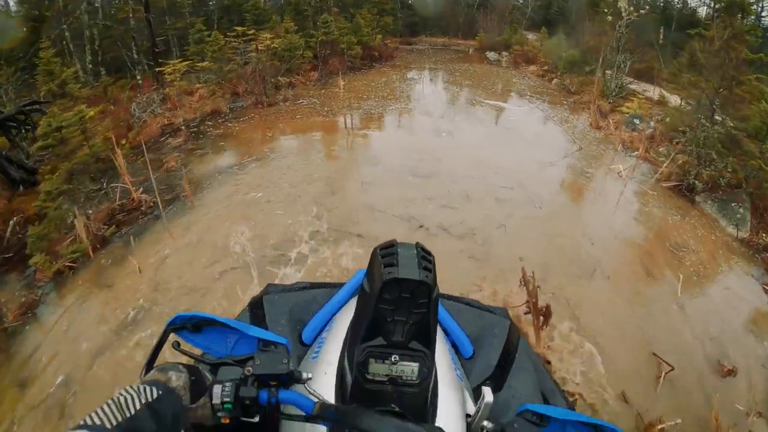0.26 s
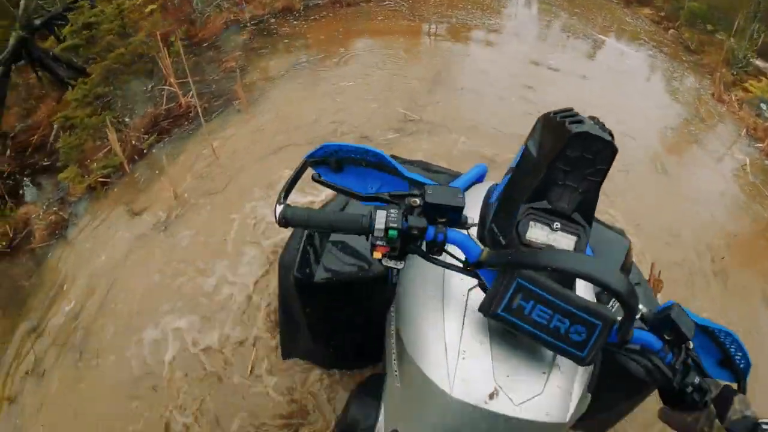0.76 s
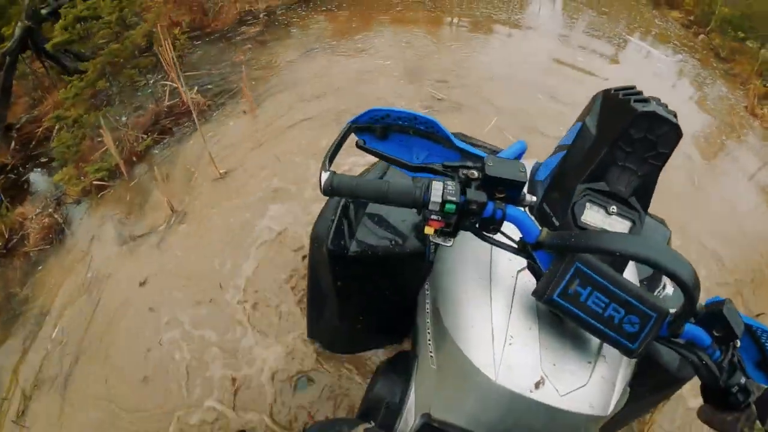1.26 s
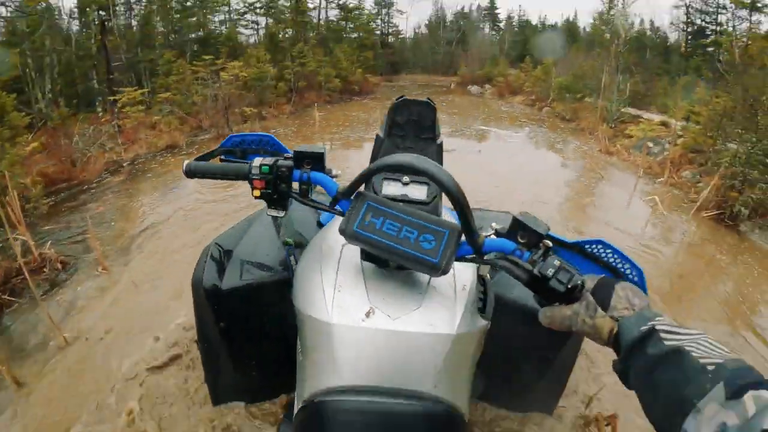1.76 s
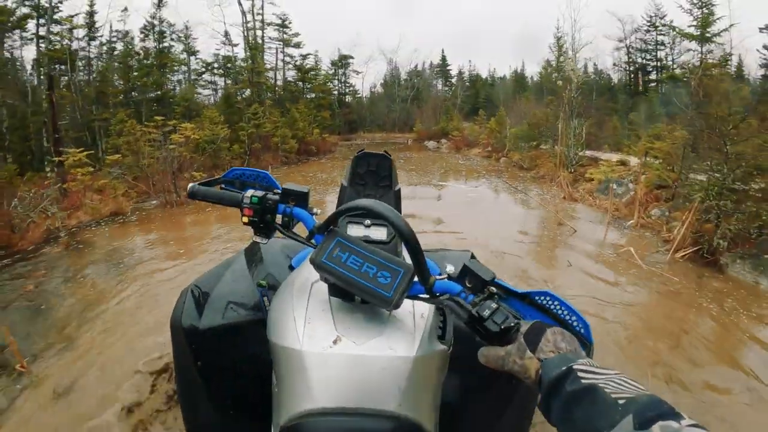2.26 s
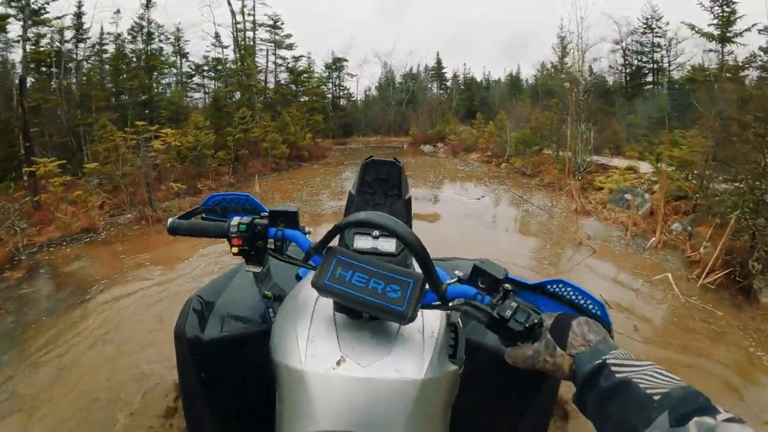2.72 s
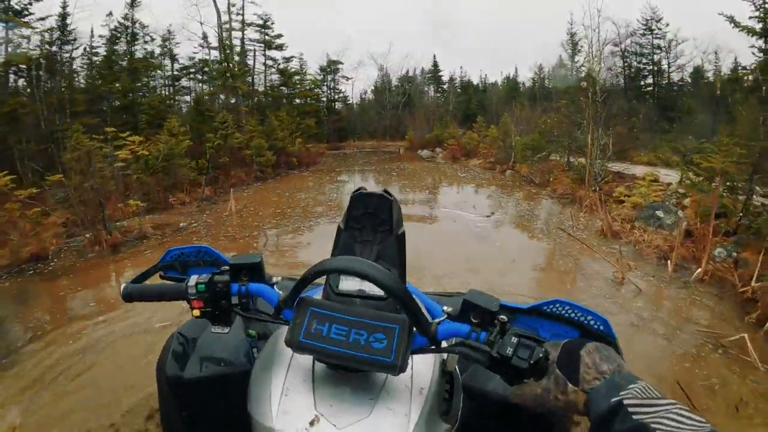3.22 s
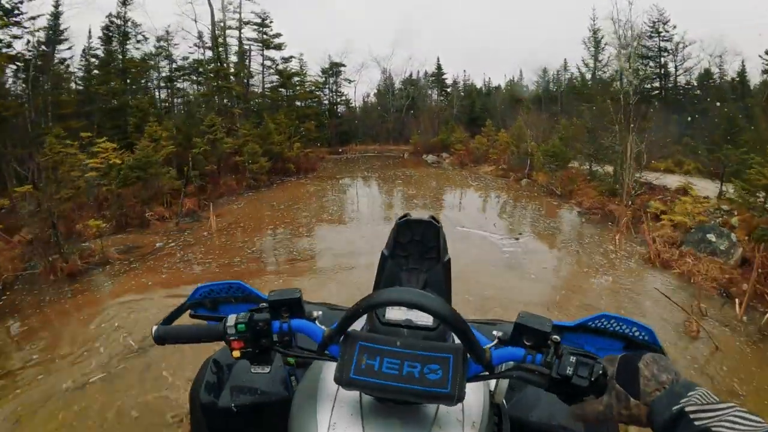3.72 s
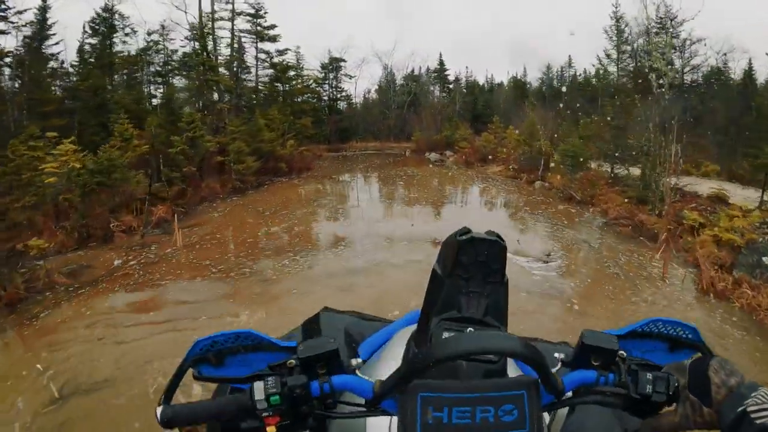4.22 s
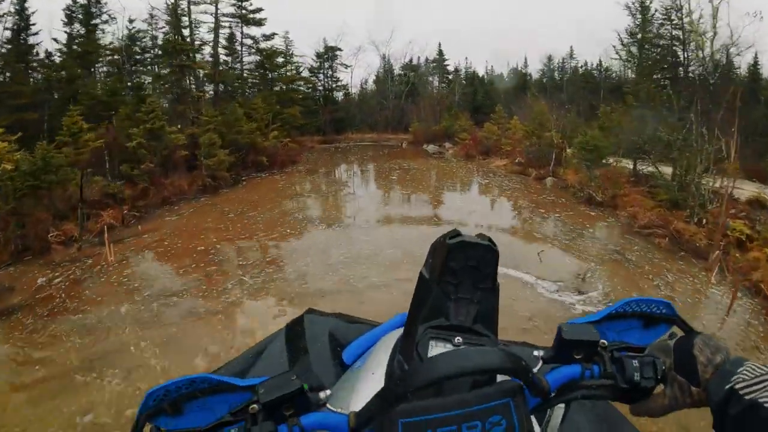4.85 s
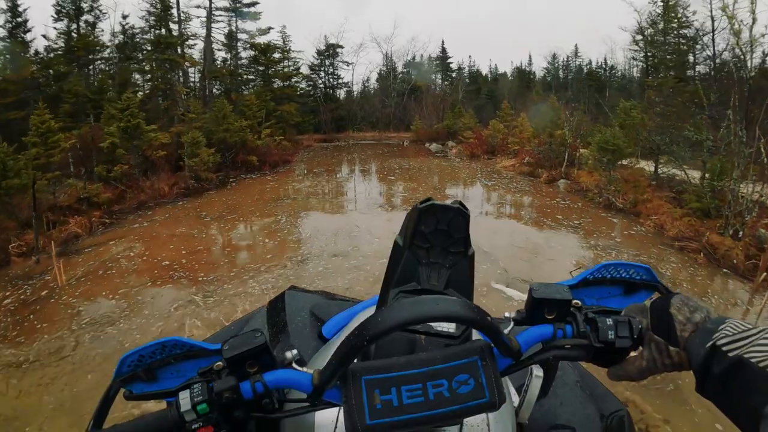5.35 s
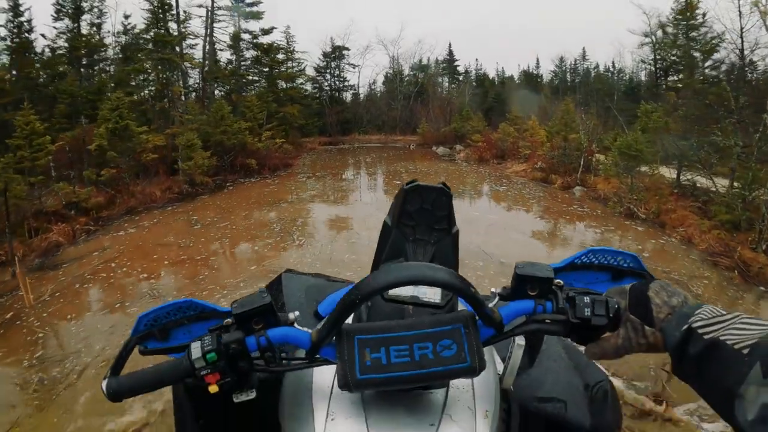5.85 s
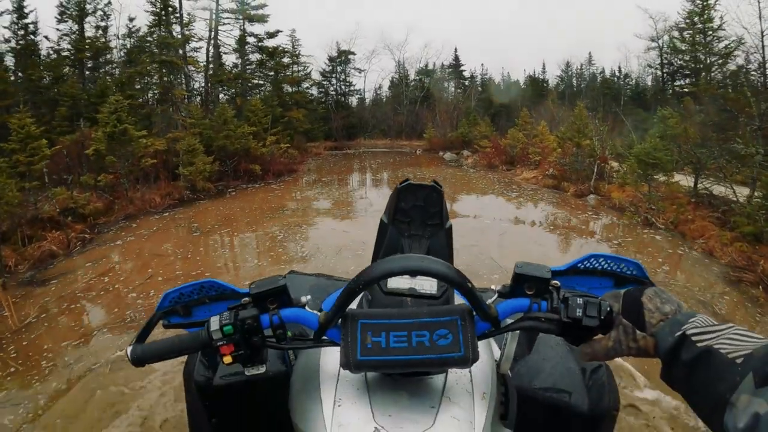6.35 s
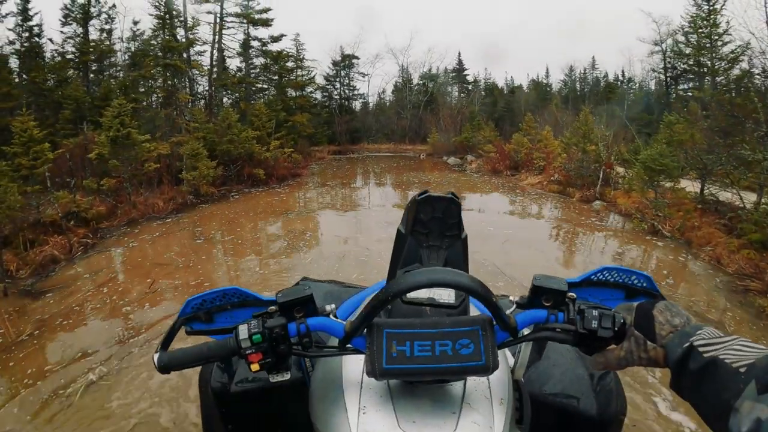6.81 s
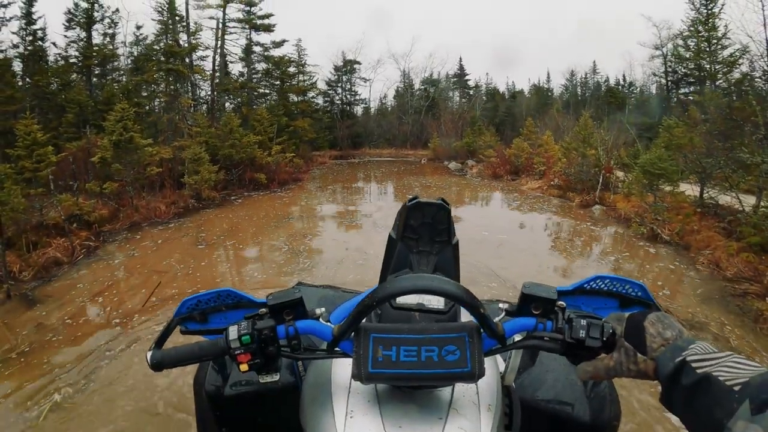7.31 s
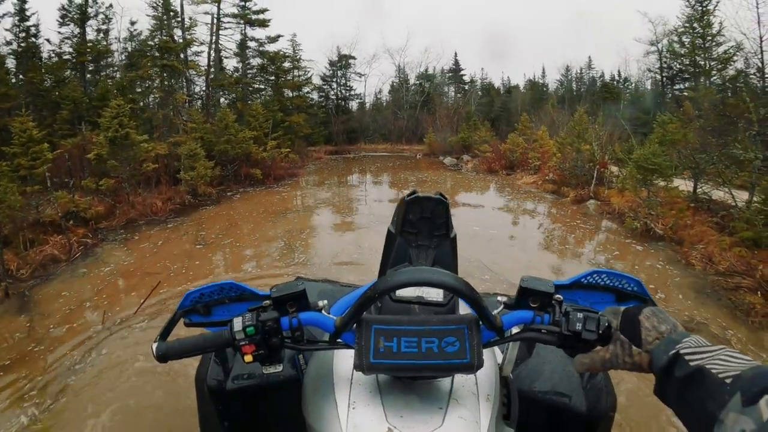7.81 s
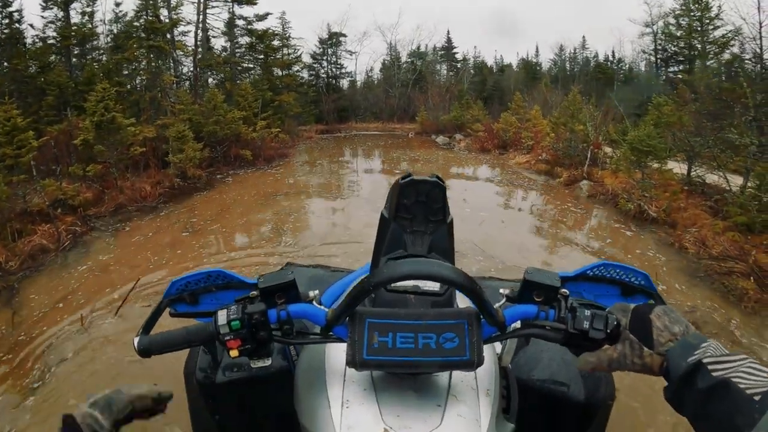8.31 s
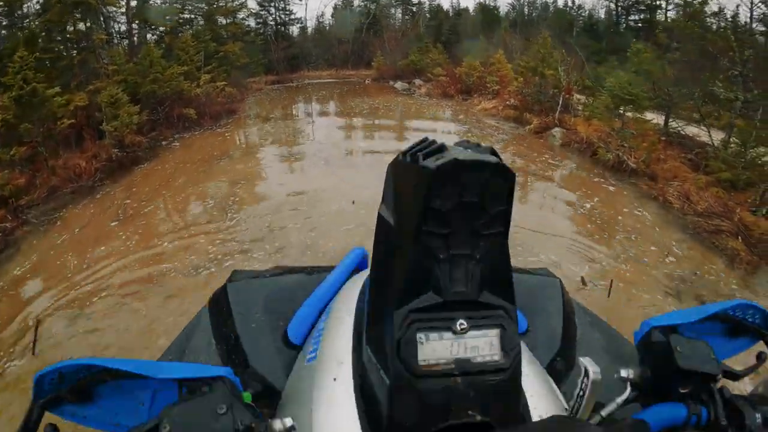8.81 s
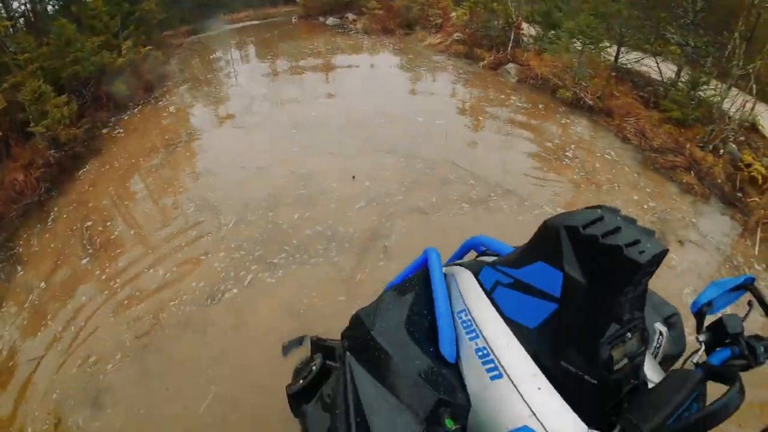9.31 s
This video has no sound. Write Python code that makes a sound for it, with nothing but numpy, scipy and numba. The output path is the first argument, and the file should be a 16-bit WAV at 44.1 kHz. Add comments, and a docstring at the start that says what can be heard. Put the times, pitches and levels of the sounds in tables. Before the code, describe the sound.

At a rider's helmet in the open, a twin-cylinder quad bike wades through muddy water. A splash and quick rev peak near 0.25 s, then the engine falls with a short gear whine, low airbox whoops and knocks at 0.4-0.7 s. From about 1.1 s it pulls steadily, its lopsided exhaust beats hollow and throaty, with gulping intake and sharp cracks. The note climbs and growls deeper around 3 s, then eases slightly, rasping near 4-5 s. Brief rough belt squeals appear around 1.8, 2.8, 3.9 and 4.5 s. The throttle shuts at 5.4 s with a squeal and whoop, blips at 5.7-5.8 s, and drops again. By 7 s it idles slowly with a soft intake moan and loose metallic clutch rattle. Knocks cluster around 8.6 s; bright rattling and a splash swell near 9 s, with a final dull knock at 9.5 s. Watery wash, droplets and bubbles continue throughout.

```python
"""A V-twin quad bike wades through a flooded trail, heard at the rider's helmet: a blip, a long pull,
a blip, then idle. Two uneven firings a cycle echo along the exhaust pipes and ring the silencer,
one of them cracks under load, and the intake rings the airbox and moans on a shut throttle.
Filtered noise makes the clutch clatter, gear whine, belt squeals and single knocks;
noise, droplet clicks and rising bubble tones make the water around the wheels."""
import sys
import numpy as np
from scipy import signal
from scipy.fft import rfft, irfft, next_fast_len
from scipy.io import wavfile
from scipy.ndimage import uniform_filter1d
from numba import njit

SR = 44100
rng = np.random.default_rng(int(sys.argv[2]) if len(sys.argv) > 2 else 0)


def transcribe(signal):
    """Save signal, clipped to [-1, 1], as a 16-bit WAV file at the path in sys.argv[1]."""
    frames = np.atleast_2d(signal).T
    limited = np.clip(frames, -1, 1)
    pcm = np.round(limited * 32767).astype(np.int16)
    wavfile.write(sys.argv[1], SR, pcm)


N = 422026
T = np.arange(N) / SR
PUSH_S = .0011  # length of a push of gas


def undb(db):
    """Decibels to gain."""
    return 10 ** (np.asarray(db) / 20)


def curves(table):
    """Each column of a table, joined by straight lines in time."""
    s, *columns = np.transpose(table)
    return [np.interp(T, s, column) for column in columns]


def swells(table):
    """Smooth rises or dips in dB, one for each row."""
    return sum(db * np.exp(-((T - s) / length) ** 2) for s, length, db in table)


def unit(x):
    """Scale to rms 1."""
    return x / np.sqrt(np.mean(x ** 2))


def noise():
    """White noise."""
    return rng.standard_normal(N)


def walk(rate):
    """Smooth random wandering, spread near 1."""
    k = int(SR / rate)
    steps = np.repeat(rng.standard_normal(N // k + 1), k)
    return 1.3 * uniform_filter1d(steps, k)[:N]


@njit
def svf(x, hz, width):
    """State-variable band-pass with a moving centre."""
    y, band, low = np.empty(len(x)), 0., 0.
    for i in range(len(x)):
        g, k = np.tan(np.pi * hz[i] / SR), width / hz[i]
        v = (band + g * (x[i] - low)) / (1 + g * (g + k))
        band, low, y[i] = 2 * v - band, low + 2 * g * v, k * v
    return y


def ring(x, hz, width):
    """One resonance, gain 1 at its centre."""
    return svf(x + 1e-18, hz * np.ones(N), float(width))


def steep_ring(x, hz, width):
    """The same resonance twice in a row, for steeper sides."""
    return ring(ring(x, hz, width), hz, width)


def body(x, modes):
    """Several steep resonances side by side."""
    # each pass is wider, since two in a row narrow the peak
    return sum(undb(db) * steep_ring(x, hz, 1.4 * width) for hz, width, db in modes)


def colour(x, points):
    """Shape a sound by (frequency [Hz], gain [dB]) points."""
    hz, db = np.transpose(points)
    size = next_fast_len(N, True)
    f = np.arange(size // 2 + 1) * SR / size + 1
    gain = undb(np.interp(np.log(f), np.log(hz), db))
    return irfft(rfft(x, size) * gain, size)[:N]


def pulses(times, sizes):
    """Clicks at the given times."""
    inside = (times >= 0) & (times < T[-1])
    return np.bincount((times[inside] * SR).astype(int), sizes[inside], N)


def strokes(crank, place, slop_s, scatter_db):
    """Times and sizes of an event that comes once a cycle, a little late or early, weak or strong."""
    turns = np.arange(int(crank[-1]) + 1) + place
    times = np.interp(turns, crank, T, right=T[-1] + 1)
    late, strong = rng.standard_normal((len(times), 2)).T
    at = lambda value: np.interp(times, T, value * np.ones(N))
    return times + at(slop_s) * late, undb(at(scatter_db) * strong)


def bursts(clicks, length_s):
    """Each click becomes a swell that rises quickly and dies away."""
    pole = np.exp(-1 / (length_s * SR))
    return signal.lfilter([1 - pole], np.poly([pole, pole]), clicks) + 1e-9


CRUISE_SPEED = 18  # cycles per second
SURGE_ACCEL, SURGE_SMOOTH_S = 13, 0.21  # acceleration of a strong surge [cycles/s per s], smoothing [s]


def effort(law, speed, throttle):
    """Level in dB of a part that follows throttle, speed and surge (positive revving up)."""
    # every law: (level at cruising speed, throttle shut [dB], full throttle adds [dB],
    # each cycle per second adds [dB], a full surge adds [dB])
    rest_db, throttle_db, speed_db, surge_db = law
    acceleration = uniform_filter1d(np.gradient(speed) * SR, int(SURGE_SMOOTH_S * SR))
    surge = np.tanh(acceleration / SURGE_ACCEL)
    return rest_db + throttle_db * throttle + speed_db * (speed - CRUISE_SPEED) + surge_db * surge


# cylinders: (firing place [cycle], share of the pipe's reflection, strength lost at idle [share], gas puff [dB])
FIRINGS = [(0, 1, 0, 0), (.379, .95, .42, -1)]
# pipe echo, quicker when the gas is hot: (time [s], first round trip [ms], second round trip [ms], reflection)
PIPE_ECHO = [(.24, 10.43, 9.95, .43), (.7, 13.17, 14.76, .51), (1.0, 13.17, 14.76, .51),
             (1.22, 12.59, 11.01, .45), (2.7, 12.57, 10.74, .43), (3.1, 11.48, 10.55, .5),
             (3.6, 11.52, 10.56, .49), (4.0, 11.92, 10.65, .48), (4.9, 12.17, 10.72, .49),
             (5.25, 11.98, 10.31, .51), (5.73, 12.96, 11.89, .36), (6.3, 14.6, 13.19, .62),
             (7.4, 13.7, 14.0, .5), (8.0, 13.91, 13.1, .52), (9.15, 14.42, 15.13, .5)]
# silencer resonances: (centre [Hz], width [Hz], path delay [s], signed share of first pipe, of second pipe)
SILENCER_NOTES = [(93, 42, .00099, -.33, -.54), (138, 77, .00138, -1.3, -1.26),
                  (184, 94, .00154, -1.31, -.92)]
SILENCER_SAG = .105  # share by which the silencer and bark sink with the throttle shut
# tailpipe bark: (centre [Hz], width [Hz], time shift [s], negative is earlier,
# signed share of first pipe, of second pipe)
BARK_NOTE = (264, 41, -.00108, -.41, -.79)
# tailpipe honk, its pitch set apart: (width [Hz], time shift [s], negative is earlier,
# share of first pipe, of second pipe)
HONK_NOTE = (152, -.00036, .39, .45)
# pitch of the honk: (time [s], centre [Hz])
HONK_PITCH = [(.8, 366), (1.5, 350), (2.2, 315), (2.6, 312), (3.15, 326), (4.0, 337), (5.7, 356), (8, 326)]
# notes of the exhaust: (time [s], silencer level [dB], bark level [dB], honk level [dB])
NOTE_LEVELS = [(.24, -1.3, 9, 1.5), (.5, -3, 2, -2), (.95, -2, 2, -4), (1.3, .2, 7.5, 0), (1.8, .9, 5, .5),
               (2.2, 1.3, -8, 4.5), (2.6, 1.3, -3.4, 5.7), (3.15, 2.4, -9.7, 6.5), (3.55, 2.1, -9.7, 4.5),
               (4.0, 1.4, -3, 4.3), (4.45, 1.6, .8, 1.9), (5.25, 1, 7, 1.5), (5.73, .6, 4.6, -.5),
               (6.35, -1.7, 8, -2), (7.4, 0, 0, -3), (8.2, .5, 1, -5), (8.6, .3, 3, -3),
               (9.15, -.6, 11.5, -3)]
# the packing swallows the upper notes: (frequency [Hz], gain [dB])
PACKING_CURVE = [(400, 0), (470, -6), (600, -6.5), (760, -15), (900, -19), (1400, -35)]
# colour of rushing gas: (frequency [Hz], gain [dB])
PUFF_COLOUR = [(200, -14), (450, 13), (660, 2.5), (900, -20.5), (1400, -11), (2200, -26.5), (5000, -40.5)]
# level laws: (rest [dB], throttle [dB], speed [dB per cycle/s], surge [dB])
GROWL_EFFORT = (-54, 11, 1, 0)
THUMP_EFFORT = (-40.5, -19, .3, 0)
PUFF_EFFORT = (-47.5, -2, -0.66, 4)
# the pipes growl against deep water: (time [s], half length [s], lift [dB])
GROWL_SWELLS = [(2.3, .4, 5), (3.15, .5, 10)]
# the gas rasps harder: (time [s], half length [s], lift [dB])
RASP_SWELLS = [(.26, 0.32, 8.5), (2.8, 0.073, 2.5), (3.9, 0.6, 10.5), (4.8, 0.47, 7.5), (6.45, 0.21, 7)]
# engine stumbles as the throttle snaps open or shut, also in the intake: (time [s], half length [s], dip [dB])
STUMBLE_DIPS = [(.06, .024, -10), (.47, .08, -3), (.635, .025, -9), (5.385, .025, -6), (5.55, .032, -8.5),
                (5.87, .033, -7)]


def exhaust(crank, speed, throttle):
    """Blowdown pulses echo along two pipes, ring the silencer and tailpipes and leave with a puff of gas."""
    lazy = 1 - throttle
    *trips_ms, reflection = curves(PIPE_ECHO)
    boom_db, bark_db, honk_db = curves(NOTE_LEVELS)
    sag = 1 - SILENCER_SAG * lazy
    modes = [(boom_db, hz * sag, *rest) for hz, *rest in SILENCER_NOTES]
    modes.append((bark_db, BARK_NOTE[0] * sag, *BARK_NOTE[1:]))
    modes.append((honk_db, curves(HONK_PITCH)[0], *HONK_NOTE))
    notes, both, blow = 0, 0, 0
    for cylinder, (firing, trip_ms) in enumerate(zip(FIRINGS, trips_ms)):
        place, echo, idle_loss, gas_db = firing
        # combustion is a little more uneven with the throttle shut
        times, sizes = strokes(crank, place, slop_s=.00012 + .00018 * lazy, scatter_db=.4 + .3 * lazy)
        at = lambda curve: np.interp(times, T, curve)
        sizes = sizes * (1 - idle_loss * at(lazy))
        trip_s = at(trip_ms) / 1000
        bounce = echo * at(reflection)
        flow = SR * PUSH_S * sum(pulses(times + n * trip_s, sizes * bounce ** n) for n in range(5))
        gas = bursts(pulses(times, sizes ** 2), length_s=.0062)
        hiss = (.04 + .05 * lazy + .04 * unit(gas)) * noise()
        stream = flow + hiss
        for db, hz, width, shift_s, *shares in modes:
            shifted = np.roll(stream, int(shift_s * SR))
            notes = notes + shares[cylinder] * undb(db) * steep_ring(shifted, hz, width)
        both = both + stream
        blow = blow + undb(gas_db) * gas
    growl = ring(ring(both, hz=384, width=26), hz=410, width=110)
    thump = steep_ring(both, hz=54, width=24)
    puff = colour((unit(blow) + .4) * noise(), PUFF_COLOUR)
    out = colour(notes, PACKING_CURVE)
    out = out + unit(growl) * undb(effort(GROWL_EFFORT, speed, throttle) + swells(GROWL_SWELLS))
    out = out + unit(thump) * undb(effort(THUMP_EFFORT, speed, throttle))
    out = out + unit(puff) * undb(effort(PUFF_EFFORT, speed, throttle) + swells(RASP_SWELLS))
    return undb(swells(STUMBLE_DIPS)) * out


# level law: (rest [dB], throttle [dB], speed [dB per cycle/s], surge [dB])
CRACK_EFFORT = (-64, 14.5, -0.43, 8)
# the engine labours and cracks harder: (time [s], half length [s], lift [dB])
LABOUR_SWELLS = [(1.2, 0.3, 1), (2.1, 0.28, 1.5), (2.76, 0.11, 4.5), (4.0, .15, 2), (4.78, 0.3, 7.5)]


def crack(crank, speed, throttle):
    """Under load, and most when revving up, the first cylinder's valve opens with a sharp crack."""
    openings = pulses(*strokes(crank, -.004, slop_s=.0002, scatter_db=.8))
    snap = bursts(openings, length_s=.0015) * noise()
    shape = [(300, -2.0), (600, 6), (1000, 0.5), (1500, 2), (2000, -9),
             (4000, -27.0), (8000, -29.5), (12000, -52)]
    crack_db = effort(CRACK_EFFORT, speed, throttle) + swells(LABOUR_SWELLS)
    return undb(crack_db) * unit(colour(snap, shape))


# airbox resonances, one feeding the other: (centre [Hz], width [Hz])
AIRBOX_NOTES = [(223.8, 24.9), (193.3, 21.9)]
# airbox ring at full throttle: (time [s], level [dB], place of the gulp [cycle])
GULPS = [(.24, 13.4, .5), (1.2, 17, .56), (1.8, 18.4, .56), (2.6, 15, .56), (3.15, 10, .59),
         (4.0, 6.6, .59), (4.45, 8, .57), (4.9, 12, .57), (5.25, 7, .58), (5.73, 18, .56)]
# moan behind a shut throttle: (time [s], pitch [Hz], level [dB], loudest place [cycle])
MOAN_CURVE = [(.85, 205, -13.5, .66), (6.35, 196, -14, .66), (7.4, 186, -12.3, .64), (8.0, 182, -12, .63),
              (8.6, 192, -12.5, .65), (9.15, 204, -12.5, .66)]
MOAN_SPREAD, MOAN_RISE_HZ_PER_S = .27, 1350  # spread in cycles
MOAN_OCTAVE_DB = -24


def intake(crank, speed, throttle):
    """A gulp each cycle rings the airbox; a shut throttle draws a rising moan that the next firing cuts off."""
    air_db, place = curves(GULPS)
    air = SR * PUSH_S * pulses(*strokes(crank - place, 0, slop_s=0.000096, scatter_db=0.8))
    for hz, width in AIRBOX_NOTES:
        air = ring(air, hz, width)
    hz, moan_db, loudest = curves(MOAN_CURVE)
    turn = crank % 1
    t = (turn - loudest) / speed + 0.0004 * walk(14)  # seconds from the loudest place, unsteady
    cutoff = np.tanh(3.5 * np.sin(np.pi * turn)) ** 2
    valve = np.exp(-((turn - loudest) / MOAN_SPREAD) ** 2) * cutoff
    angle = 2 * np.pi * t * (hz + MOAN_RISE_HZ_PER_S * t / 2)
    octave = undb(MOAN_OCTAVE_DB) * valve ** 2 * np.cos(2 * angle)
    moan = valve * (np.cos(angle) + octave) * undb(1.2 * walk(90))
    pulling = throttle * undb(air_db) * air
    shut = (1 - throttle) * undb(moan_db + walk(12)) * moan
    return undb(swells(STUMBLE_DIPS)) * (pulling + shut)


# whoops as the throttle snaps shut: (time [s], half length [s], pitch [Hz], glide [Hz/s], level [dB])
WHOOP_EVENTS = [(.365, .016, 215, -600, -13), (.583, .02, 218, -1700, -12), (5.435, .016, 222, -800, -13),
                (5.922, .014, 210, -900, -14)]


def whoops():
    """The airbox rings and sinks in pitch when its air is cut off."""
    out = 0
    for s, length, hz, glide, db in WHOOP_EVENTS:
        t = T - s
        tone = np.cos(2 * np.pi * t * (hz + glide * t / 2))
        out = out + undb(db) * np.exp(-(t / length) ** 2) * tone
    return out


# clutch housing resonances: (centre [Hz], width [Hz], level [dB])
HOUSING_NOTES = [(1064, 50, 0), (1303, 120, 4.5), (1430, 100, 5.5), (1546, 130, 1.5), (2300, 350, -13),
                 (2900, 110, -13.5), (3750, 310, -20.5)]
# bright jingle resonances: (centre [Hz], width [Hz], level [dB])
JINGLE_NOTES = [(4250, 230, -9.5), (5590, 450, -4), (6800, 430, -12), (8600, 280, -5)]
# clutch clatter: (time [s], level [dB])
CLATTER_CURVE = [(0, -51), (.27, -46.5), (.55, -53), (1.5, -48.5), (2.5, -51), (2.9, -47), (6.8, -46),
                 (7.2, -40), (7.9, -45), (8.55, -41.5), (9.27, -44), (9.57, -59)]
# the jingle flares up: (time [s], half length [s], lift [dB])
JINGLE_SWELLS = [(1.08, 0.1, 13.5), (7.15, 0.3, 9), (9.0, 0.097, 6)]
# the clatter turns bright: (time [s], half length [s], lift [dB])
RATTLE_SWELLS = [(7.15, .2, 9), (9.0, .13, 17), (9.24, .08, 17)]
JINGLE_DB, JINGLE_SLACK_DB = -70.5, 13  # running taut; added when the clutch is slack
RATTLE_DB = -68


def drive(crank, speed, throttle):
    """At low speed the clutch rattles twice a cycle; faster, it runs in a steady rush with a gear whine."""
    slack = np.clip((15.5 - speed) / 3, 0, 1)
    lash = 0
    # hits in two groups: (place [cycle], level [dB])
    for place, db in [(.155, -2), (.22, -3), (.745, -1.5), (.83, -3.5), (.9, -10)]:
        lash = lash + undb(db) * pulses(*strokes(crank, place, slop_s=0.0017, scatter_db=1.4))
    rattle = unit(bursts(lash, length_s=0.0029))
    rush = 1.06 * undb(1.4 * walk(60))
    shake = slack * (rattle + 0.08) + (1 - slack) * rush
    clatter = undb(curves(CLATTER_CURVE)[0]) * unit(body(shake * noise(), HOUSING_NOTES))
    jingle_db = JINGLE_DB + swells(JINGLE_SWELLS) + JINGLE_SLACK_DB * slack
    jingle = undb(jingle_db) * unit(body(shake * undb(2 * walk(90)) * noise(), JINGLE_NOTES))
    whine_db = -55.5 - 2.5 * (speed - 20.2) ** 2  # loudest at 20.2 cycles per second
    whine = undb(whine_db) * throttle * unit(steep_ring(noise(), 127 * speed, 140))
    bright_db = RATTLE_DB + swells(RATTLE_SWELLS)
    bright = undb(bright_db) * slack * unit(ring(rattle * noise(), hz=2300, width=600))
    return clatter + bright + jingle + whine


# the row at 0.33 s is gear whine falling with the engine speed; the other rows are belt squeals:
# (time [s], half length [s], pitch [Hz], glide [Hz/s], level [dB])
WHINE_AND_SQUEALS = [(.33, 0.13, 1050, -1200, -48), (1.83, 0.1, 1370, -700, -43.5),
                     (2.15, 0.28, 1110, -60, -53), (2.784, 0.23, 1324, 304, -51.5),
                     (3.87, 0.038, 1380, 0, -47), (4.482, 0.055, 1400, 3, -45),
                     (5.431, 0.073, 1364, -1700, -41), (5.812, 0.085, 1340, -300, -41),
                     (7.2, 0.02, 1264, 0, -40)]


def whine_and_squeals():
    """A short falling gear whine, then rough belt squeals: noise through a narrow gliding resonance."""
    out = 0
    for s, length, hz, glide, db in WHINE_AND_SQUEALS:
        pitch = hz + glide * np.clip(T - s, -.15, .15)
        tone = unit(steep_ring(noise(), pitch, 55))
        out = out + undb(db) * np.exp(-((T - s) / length) ** 2) * tone
    return out


# single knocks: hard hits of the slack clutch and other parts, and a bright droplet tick at 8.88 s:
# (time [s], peak level before a 5.5 dB lift [dB], pitch [Hz])
SINGLE_KNOCKS = [(0.405, -40, 1770), (0.679, -34, 1420), (7.186, -38, 1290), (8.2521, -48, 1540),
                 (8.555, -35, 1560), (8.6046, -42, 1440), (8.693, -38, 1260), (8.884, -41, 4500),
                 (9.5223, -32, 942)]


def knocks():
    """Short dead knocks and one droplet tick: a dying noise burst through a broad resonance."""
    out = np.zeros(N + SR)
    t = T[:SR // 20]
    for s, db, hz in SINGLE_KNOCKS:
        blow = rng.standard_normal(len(t)) * np.exp(-t / 0.0033)
        resonance = signal.iirpeak(hz, 1.1, fs=SR)
        hit = signal.lfilter(*resonance, signal.lfilter(*resonance, blow))
        out[int(s * SR):][:len(t)] += undb(db + 5.5) * hit / np.abs(hit).max()
    return out[:N]


# water colour: (frequency [Hz], gain [dB])
WATER_COLOUR = [(300, -4.5), (800, -3), (1300, 0.5), (2000, -1.5), (2700, -3.5), (3400, -6), (4500, -10.5),
                (6000, -12.5), (7500, -19.5), (10000, -14), (12000, -30.5)]
# level law: (rest [dB], throttle [dB], speed [dB per cycle/s], surge [dB])
WATER_EFFORT = (-47.5, -0.7, 0.49, 0.5)
# waves thrown up by the wheels: (time [s], half length [s], lift [dB])
SPLASH_SWELLS = [(.02, 0.096, 7.5), (.42, 0.08, 4), (1.2, 0.4, 2.5), (4.6, 0.73, 1.5), (7.1, 0.2, 1),
                 (9.05, 0.24, 6.5)]


def water(crank, speed, throttle):
    """Churned water: a surging wash, spray droplets and small rising bubbles."""
    water_db = effort(WATER_EFFORT, speed, throttle) + swells(SPLASH_SWELLS)
    count = 9000
    sizes = undb(1.1 * np.minimum(rng.exponential(size=count), 6))
    drops = pulses(rng.uniform(0, T[-1], count), rng.choice([-1, 1], count) * sizes)
    surge_db = 1.0 * np.cos(2 * np.pi * (crank - .2))  # once a cycle
    wash = noise() * undb(1.4 * walk(45) + surge_db)
    bubbles, t = np.zeros(N + SR), T[:SR // 30]
    for when, pitch, size in rng.random((500, 3)):
        cycles = 700 * 7 ** pitch * t  # starting pitch 700 to 4900 Hz
        tone = np.sin(2 * np.pi * cycles * (1 + 0.0076 * cycles)) * np.exp(-cycles / 6)
        bubbles[int(when * N):][:len(t)] += undb(-20 * size) * tone
    spray = unit(colour(wash + .65 * unit(drops), WATER_COLOUR))
    return undb(water_db) * (spray + undb(-12.0) * unit(bubbles[:N]))


# crank speed: (time [s], four-stroke cycles per second)
CRANK_SPEED = [(0.0, 13.356), (0.24, 26.682), (0.38, 21.513), (0.5, 20.028), (0.65, 14.07), (1.06, 13.991),
               (1.26, 18.366), (2.17, 17.725), (2.78, 18.637), (3.06, 21.289), (3.7, 20.903),
               (3.84, 19.984), (4.08, 20.698), (4.66, 19.492), (5.12, 19.261), (5.24, 20.455),
               (5.58, 14.452), (5.79, 18.33), (5.96, 14.083), (6.59, 12.968), (7.1, 10.946), (7.49, 11.561),
               (7.89, 11.034), (8.39, 11.418), (9.16, 11.045), (9.57, 11.257)]
# throttle: (time [s], opening [0-1])
THROTTLE_CURVE = [(0, 0), (.11, 1), (.3, 0.97), (.39, 0), (1.0, 0.27), (1.16, 1), (5.32, 0.93), (5.39, 0.4),
                  (5.55, 0.3), (5.64, 1), (5.8, 0.92), (5.88, 0.2), (6.6, 0)]


def scene():
    """The crank angle times every part of the engine and the churning of the wheels."""
    speed = curves(CRANK_SPEED)[0]
    throttle = np.clip(curves(THROTTLE_CURVE)[0], 0, 1)
    crank = np.cumsum(speed) / SR - .44  # in cycles
    quad = sum(part(crank, speed, throttle) for part in (exhaust, crack, intake, drive, water))
    return (quad + whoops() + whine_and_squeals() + knocks())[None]


TOP_HZ = 12500


def record(dry):
    """The helmet microphone loses deep bass and the top treble, dips near 9 kHz and rounds the peaks."""
    x = signal.sosfilt(signal.butter(4, 40, "high", fs=SR, output="sos"), dry)
    x = np.tanh(0.45 * x) / 0.42
    x = colour(x[0], [(7800, 0), (8700, -14.0), (9000, -21.5), (9500, -10), (10000, -6.0)])[None]
    return signal.sosfilt(signal.ellip(8, .2, 70, TOP_HZ, fs=SR, output="sos"), x)


dry = scene()
out = record(dry)
transcribe(out)
```